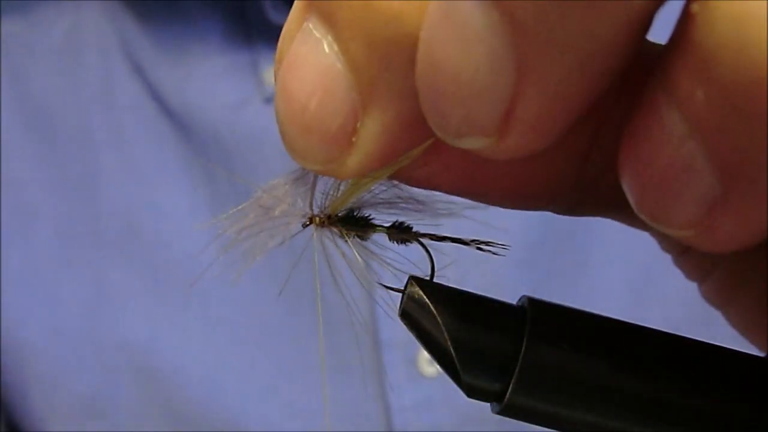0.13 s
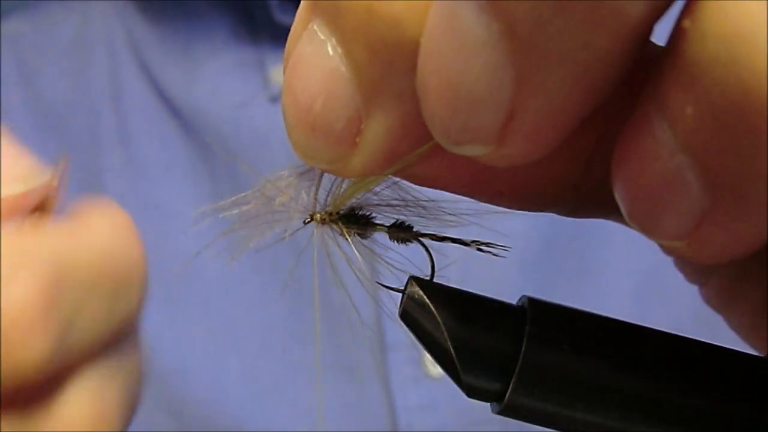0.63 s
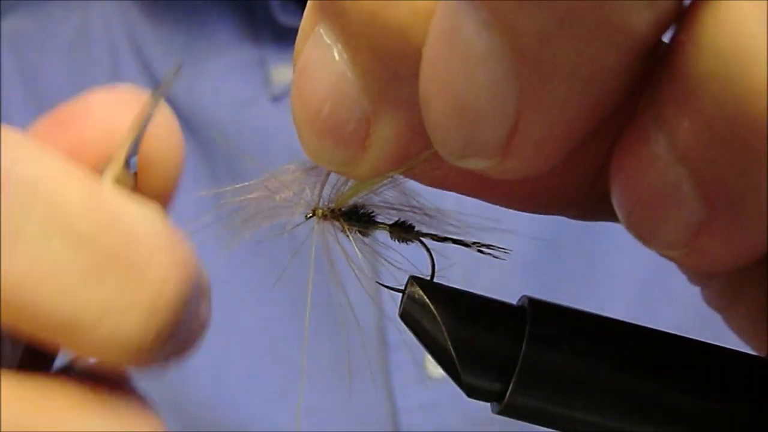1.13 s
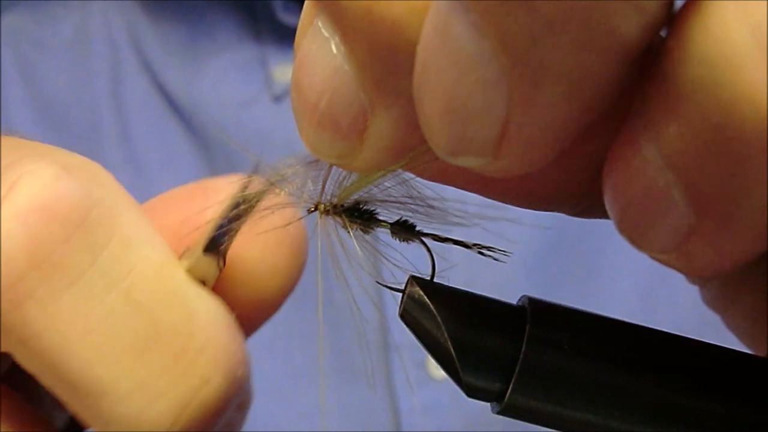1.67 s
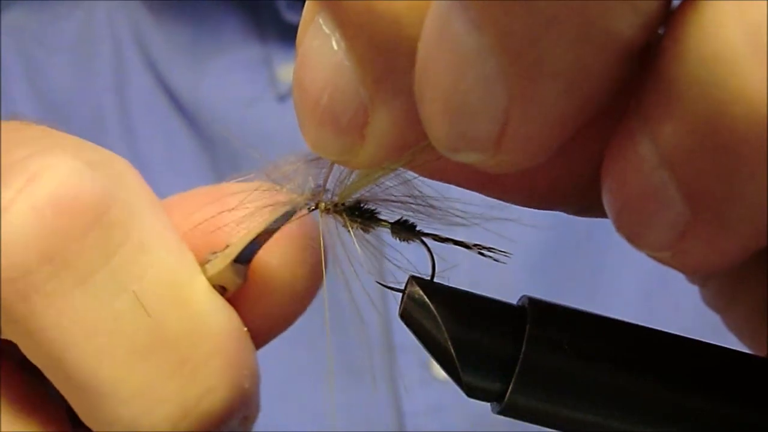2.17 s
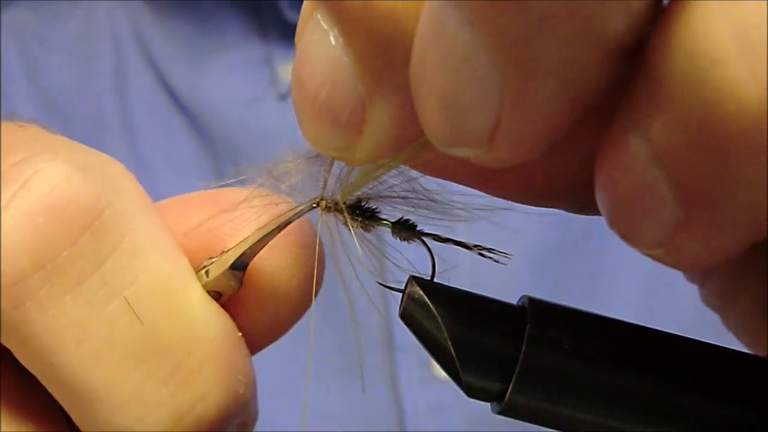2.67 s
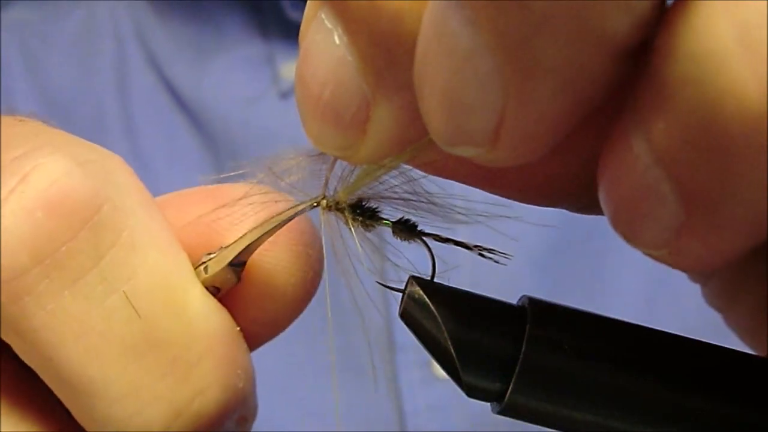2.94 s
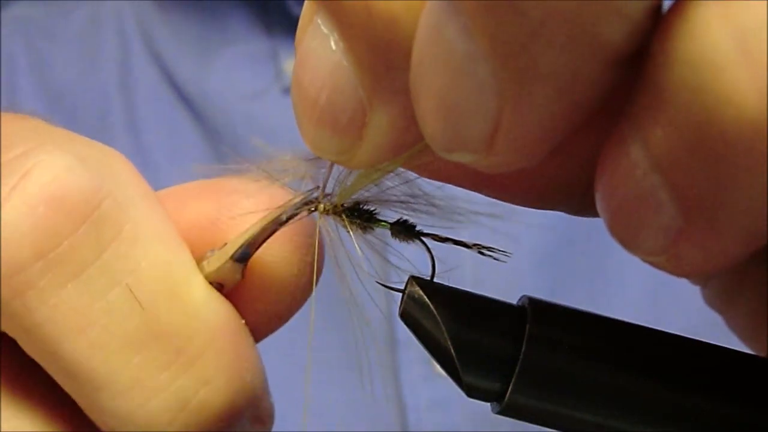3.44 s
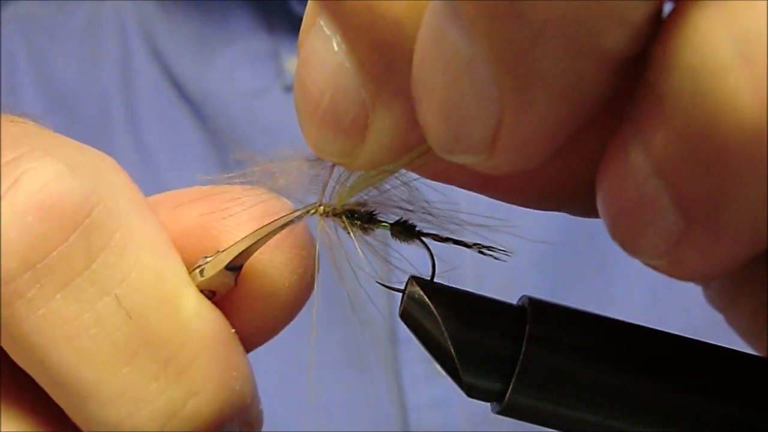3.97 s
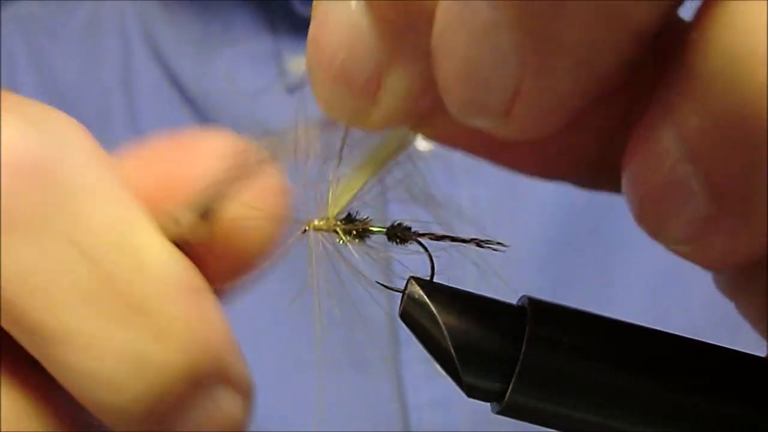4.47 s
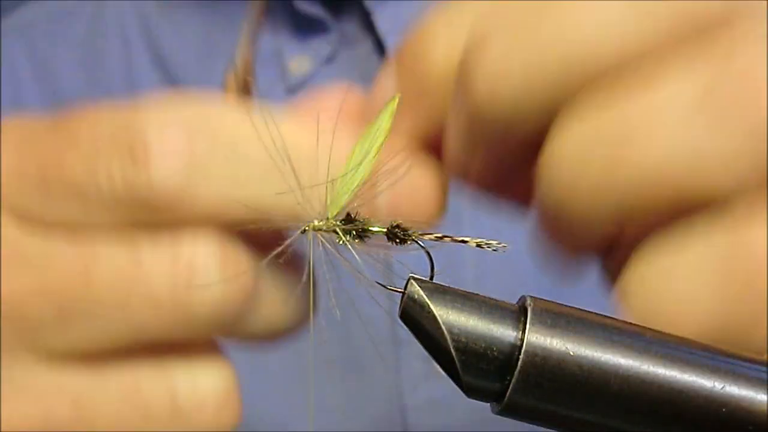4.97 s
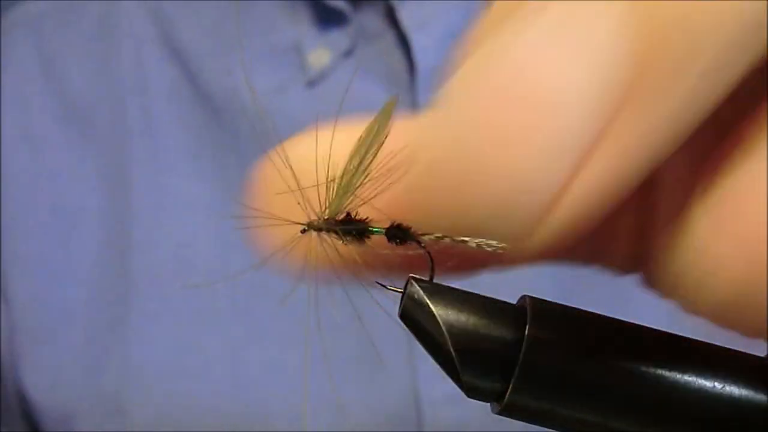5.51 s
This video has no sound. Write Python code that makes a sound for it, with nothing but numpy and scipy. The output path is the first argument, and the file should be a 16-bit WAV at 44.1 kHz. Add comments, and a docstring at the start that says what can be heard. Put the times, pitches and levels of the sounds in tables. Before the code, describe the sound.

Close mono pickup of fly tying at a bench vise in a small room. Low rumble and soft hiss swell over two seconds, then hold. Sparse tiny steel ticks come and go; fine scissors snip crisply near three seconds and again, much harder, past four, with a woody knock, then a few light clicks.

```python
"""Steel tools at a tying vise

Small steel tools tick as fingers handle them, each tick a rough touch that sets steel ringing, and steel
whistles faintly along thread. Fine scissors snip twice, the second cut jolting the vise and bench.
A small room answers with dense fading reflections, over rumble and hiss (shaped noise) that swell in the
first seconds and then hold steady. One microphone feeds both channels."""
import sys
import numpy as np
from scipy import signal
from scipy.fft import rfft, irfft, next_fast_len
from scipy.io import wavfile

SR = 44100
rng = np.random.default_rng(int(sys.argv[2]) if len(sys.argv) > 2 else 0)


def nominal_scale(level):
    """Amplitude ratio for a level in decibels (scalar or array-like)."""
    x = np.asarray(level, float) / 20
    return 10 ** x


def inscribe(sig):
    """Save sig as 16-bit PCM at rate SR to the path in sys.argv[1].

    A 1-D sig is mono; a 2-D sig holds one channel per row.
    Samples are clipped to [-1, 1] before scaling.
    """
    pcm = np.round(np.clip(np.atleast_2d(sig).T, -1, 1) * 32767)
    wavfile.write(sys.argv[1], SR, pcm.astype(np.int16))


N = 247753   # length of the scene in samples

# The steady noise. Each row: pitch in Hz, relative level in dB per Hz.
BACKGROUND_COLOUR = [(12, -43), (20, -7), (76, -1), (196, -4), (334, -7.5), (363, -7.5), (551, -11.5),
                     (910, -14.5), (1270, -17), (3980, -22), (4330, -23), (13200, -24.5), (15600, -24.5)]
# Ticks of the steel tools. Each row: start in seconds, level of the ringing in dB over 5 ms,
# colour at 5 kHz in dB against 8 kHz.
STEEL_TICKS = [(0.157, -63, 1), (0.4061, -45.5, 5), (0.9363, -42.5, 0), (1.3015, -46, -9), (1.4174, -58, 7),
               (1.561, -60, 0), (2.042, -58, -7), (2.834, -59, -12), (3.196, -58, -6), (3.207, -58, 0),
               (3.568, -58, -14), (3.932, -56, 9), (4.3694, -45, -11), (4.494, -58, 3),
               (4.9291, -51.5, -14), (4.93, -48.5, -5), (5.071, -53, 4), (5.5555, -52, -6)]
# Scissor cuts. Each row: start in seconds, level of the ringing in dB over 5 ms, colour at 4.7 kHz and
# colour at 6.4 kHz in dB against 8 kHz, contact length in ms.
SCISSOR_CUTS = [(3.1826, -28, -18, 5, 0.4), (4.352, -20.5, 0.5, 0.5, 1.24)]
# Ringing modes of scissors and pliers. Each row: pitch in Hz, relative level in dB,
# time to fade by 60 dB in seconds.
STEEL_MODES = [(2410, -3, 0.0099), (2790, -0.5, 0.018), (3190, 4, 0.0024), (4540, -4, 0.0099),
               (4790, -1, 0.0077), (5240, -4, 0.013), (5300, -24, 0.14), (5900, 2.5, 0.0031),
               (6110, -4.5, 0.0081), (6680, 0, 0.0066), (7800, -0.5, 0.0022), (8700, 0.5, 0.0043),
               (8650, -11, 0.028), (9200, 5.5, 0.0036), (10700, -2, 0.0039), (11560, 3, 0.0031),
               (12930, -11, 0.013), (13460, -1.5, 0.01), (14400, 3.5, 0.0087), (16170, -9, 0.0062)]
# The room's answer. Each row: pitch in Hz, level in dB against the direct sound,
# time to fade by 60 dB in seconds.
ROOM_ANSWER = [(100, -7.5, 0.56), (457, 5, 0.65), (850, -7.5, 0.45), (1680, -1.5, 0.63), (2980, -11, 0.42),
               (5660, -9.5, 0.48), (7440, -17, 0.34), (11000, -17, 0.46), (15000, -15, 0.2)]
# Faint whistles as steel slides on thread. Each row: start in seconds, level in dB before the stroke
# shapes it, pitch in Hz, fading time in ms.
THREAD_SLIDES = [(.412, -71, 8450, 74), (.953, -64.5, 8650, 76), (2.6, -59.5, 8360, 22),
                 (4.09, -65, 8000, 25), (5.555, -55, 8000, 11)]
# Jolts that reach vise and bench. Each row: start in seconds, level in dB over 5 ms,
# strongest pitch in Hz, breadth in octaves, contact length in ms.
BENCH_JOLTS = [(4.3526, -29.5, 766, 0.25, 3.9), (4.353, -37, 100, 1.2, 2.1), (4.3522, -42, 1710, 0.72, 1),
               (4.369, -30, 1280, 1.05, 0.45), (4.371, -40.5, 90, 0.97, 1.5), (4.455, -44.5, 850, 0.18, 10),
               (4.489, -51, 500, 4.2, 0.31), (4.928, -49, 297, 2.8, 1.6)]
# Ringing modes of vise and bench. Each row: pitch in Hz, relative level in dB,
# time to fade by 60 dB in seconds.
BENCH_MODES = [(85, 1.5, 0.31), (186, -4, 0.034), (272, 2.5, 0.038), (398, 0.5, 0.03), (603, 0, 0.078),
               (663, -10, 0.06), (824, 3.5, 0.045), (886, 3.5, 0.03), (1053, 0, 0.043), (1410, 0, 0.049),
               (1280, -9, 0.0067), (1556, -3.5, 0.016), (1850, 2.5, 0.0037), (2240, 3, 0.013),
               (3020, -10, 0.0077)]

QUIET_DB, FULL_DB, SWELL_S = -61.5, -53.9, 2.07   # the background climbs evenly in dB, then holds
HISS_TOP_HZ = 15600
TICK_MS, TICK_LOW_DB, TICK_TOP_DB = 1, -16, -13.5   # contact length; colour at 3 and 13 kHz
FIDGETS_PER_S, FIDGET_DB = 1.4, -65   # average rate and middle level of the barely heard ticks
SNIP_LOW_DB, SNIP_TOP_DB = -5.5, -7.5   # colour of a cut at 3 and 13 kHz
SHEAR_MS, SHEAR_DB = 1.095, -20.5   # lead and contact length of the shear; its level against the snap
CRACK_DB, CRACK_LOW_HZ = -8, 2500   # the bare contact noise beside the ringing
TABLE_ECHO_MS, TABLE_ECHO_DB = 1.289, -11
ROOM_RISE_MS = 0.81
SLIDE_WIDTH_HZ, SLIDE_START_MS = 730, 2.2
OVERLOAD = 0.35   # ceiling that the loudest peaks bend towards
TREBLE_CUT_HZ = 17200


def at_hz(rows, hz):
    """Reads the columns of a table at any pitch, in between rows on a log-frequency axis."""
    centre, *columns = np.transpose(rows)
    return [np.interp(np.log(hz), np.log(centre), column) for column in columns]


def background():
    """Smooth noise: distant rumble below and hiss above, the whole noise ending sharply at the top."""
    size = next_fast_len(N)
    hz = np.maximum(np.fft.rfftfreq(size, 1 / SR), 1)
    colour = nominal_scale(at_hz(BACKGROUND_COLOUR, hz)[0]) * (hz < HISS_TOP_HZ)
    noise = irfft(rfft(rng.standard_normal(size)) * colour, size)[:N]
    risen = np.minimum(np.arange(N) / SR / SWELL_S, 1)
    return noise / noise.std() * nominal_scale(QUIET_DB + (FULL_DB - QUIET_DB) * risen)


def add(track, s, sound):
    """Mixes a sound into the track at time s in seconds."""
    at = round(s * SR)
    track[at:at + len(sound)] += sound[:len(track) - at]


def contact(ms, size):
    """A sharp touch, then rough edges grinding and letting go over the length of the contact."""
    t = np.arange(size) / SR
    touch = (t == 0) * 4.3
    grinding = rng.standard_normal(size) * np.exp(-(t / (ms / 1000)) ** 0.9)
    return touch + grinding


def strike(force, modes, colour_db):
    """A force sets every mode ringing, each with the energy its colour allows; rms 1 if packed in 5 ms."""
    out = 0
    for k, ((hz, level_db, t60), db) in enumerate(zip(modes, colour_db)):
        decay = nominal_scale(-60 / (t60 * SR))   # what is left after one sample
        turn = 2 * np.pi * hz / SR
        resonator = [1, -2 * decay * np.cos(turn), decay * decay]
        ringing = signal.lfilter([1, 0, -1], resonator, force + 1e-18)
        sign = (-1) ** k   # neighbouring modes push opposite ways
        out = out + sign * nominal_scale(level_db + db) * ringing / np.linalg.norm(ringing)
    return out * np.sqrt(SR / 200) / np.linalg.norm(out)


def fidgets():
    """Faint ticks of shifting fingers, each with a chance time, strength and colour."""
    draws = rng.random((16, 3))
    times = np.cumsum(-np.log(1 - draws[:, 0]) / FIDGETS_PER_S)   # chance waits between ticks
    ticks = []
    for s, (_, strength, colour) in zip(times, draws):
        if s < N / SR:
            ticks.append((s, FIDGET_DB + 4 * (strength - 0.5), 20 * colour - 15))
    return ticks


def steel():
    """Each touch's colour picks which modes speak; blades shear softly just before they snap shut."""
    touches = []
    for s, db, mid in STEEL_TICKS + fidgets():
        touches.append((s, db, TICK_MS, [(3000, TICK_LOW_DB), (5000, mid)], TICK_TOP_DB))
    for s, db, mid, high, ms in SCISSOR_CUTS:
        lower = [(3000, SNIP_LOW_DB), (4700, mid), (6400, high)]
        touches.append((s - SHEAR_MS / 1000, db + SHEAR_DB, SHEAR_MS, lower, SNIP_TOP_DB))
        touches.append((s, db, ms, lower, SNIP_TOP_DB))
    out, pitches = np.zeros(N), np.array(STEEL_MODES)[:, 0]
    high_pass = signal.butter(2, CRACK_LOW_HZ, "high", fs=SR, output="sos")
    for s, level_db, ms, lower, top_db in touches:
        colour, = at_hz(lower + [(8000, 0), (13000, top_db)], pitches)
        chance = rng.standard_normal(len(STEEL_MODES))   # dB, so no two touches are alike
        force = contact(ms, size=8192)
        crack = signal.sosfilt(high_pass, force)
        crack *= nominal_scale(CRACK_DB) * np.sqrt(SR / 200) / np.linalg.norm(crack)
        ringing = strike(force, STEEL_MODES, colour + chance)
        add(out, s, nominal_scale(level_db) * (ringing + crack))
    return out


def room(x):
    """Dense reflections that rise at once, each third of an octave dying at its own rate."""
    t = np.arange(SR // 2) / SR
    edges = 60 * 2 ** np.arange(0, 8.1, 1 / 3)
    white = rng.standard_normal((2, len(t)))
    answer = 0
    for k, (low, high) in enumerate(zip(edges, edges[1:])):
        level_db, t60 = at_hz(ROOM_ANSWER, np.sqrt(low * high))
        band_pass = signal.butter(2, [low, high], "band", fs=SR, output="sos")
        band = signal.sosfilt(band_pass, white[k % 2])   # neighbours use different noise
        fading = nominal_scale(level_db - 60 * t / t60)
        answer = answer + band * fading / np.sqrt(t60 * SR / np.log(1e6))   # same energy for any t60
    onset = np.clip(t / (ROOM_RISE_MS / 1000), 0, 1) ** 2
    return signal.fftconvolve(x, answer * onset)[:N]


def slides():
    """Friction noise in one narrow resonance, quick to start and fading out."""
    out, t = np.zeros(N), np.arange(4096) / SR
    for s, level_db, hz, ms in THREAD_SLIDES:
        edges = [hz - SLIDE_WIDTH_HZ / 2, hz + SLIDE_WIDTH_HZ / 2]
        band_pass = signal.butter(2, edges, "band", fs=SR, output="sos")
        whistle = signal.sosfilt(band_pass, rng.standard_normal(len(t)))
        stroke = np.minimum(t / (SLIDE_START_MS / 1000), 1) * np.exp(-(t / (ms / 1000)) ** 2)
        add(out, s, nominal_scale(level_db) * stroke * whistle / whistle.std())
    return out


def bench():
    """Each jolt favours the modes near one pitch; a long contact lets them swell."""
    out, pitches = np.zeros(N), np.array(BENCH_MODES)[:, 0]
    for s, level_db, hz, octaves, ms in BENCH_JOLTS:
        colour = -6 * (np.log2(pitches / hz) / octaves) ** 2   # 6 dB down at the breadth
        force = contact(ms, size=16384)
        add(out, s, nominal_scale(level_db) * strike(force, BENCH_MODES, colour))
    return out


def scene():
    """Tools close by, the table under them, the room behind them, the same in both channels."""
    ticks = steel()
    tools = ticks + slides() + bench()
    add(tools, TABLE_ECHO_MS / 1000, nominal_scale(TABLE_ECHO_DB) * ticks)   # the table top sends the steel back once
    return np.tile(tools + room(tools) + background(), (2, 1))


def top_cut(x):
    """Nothing passes above the cut-off."""
    return signal.sosfilt(signal.butter(12, 17090, fs=SR, output="sos"), x)


def record(dry):
    """The loudest peaks are rounded, and a steep low-pass takes off the extreme treble."""
    rounded = OVERLOAD * np.tanh(dry / OVERLOAD)
    low_pass = signal.cheby2(8, 40, TREBLE_CUT_HZ, fs=SR, output="sos")
    mix = signal.sosfilt(low_pass, rounded)
    return top_cut(mix)


dry = scene()
out = record(dry)
inscribe(out)
```